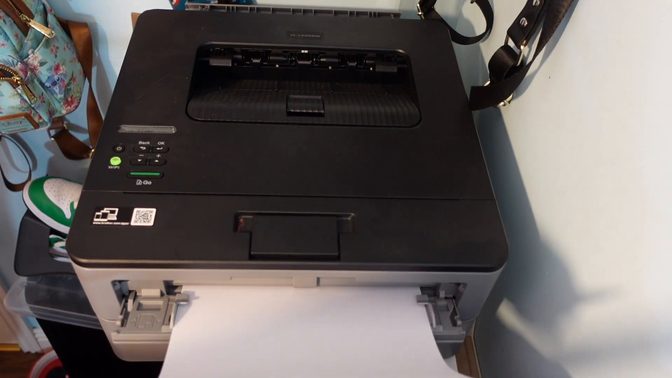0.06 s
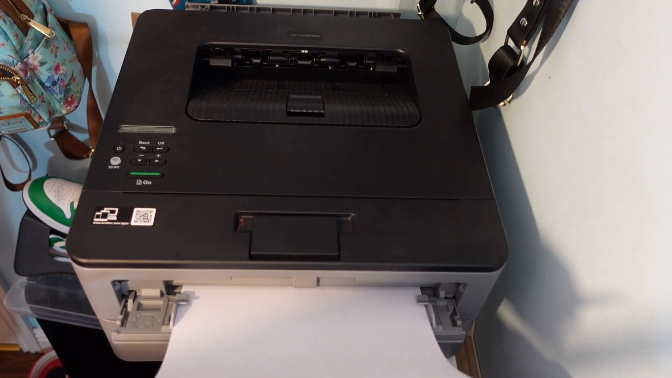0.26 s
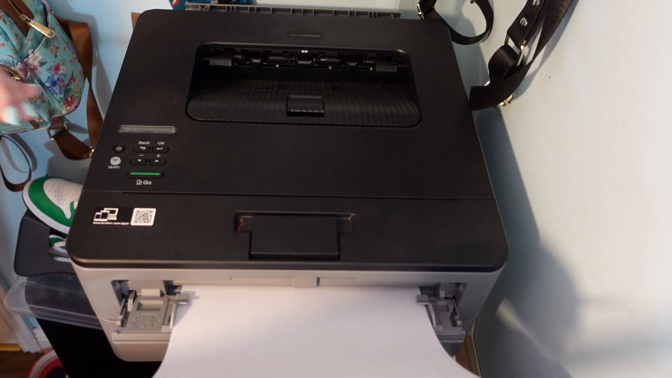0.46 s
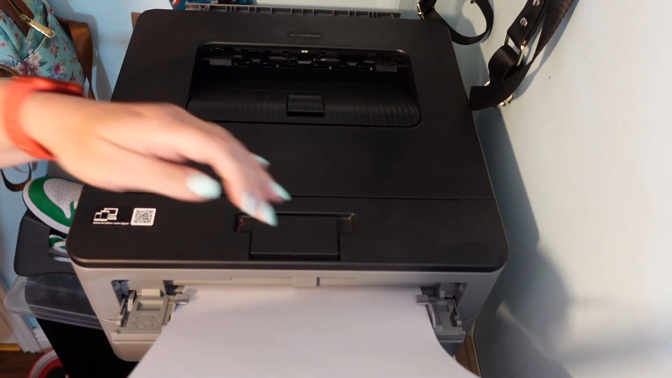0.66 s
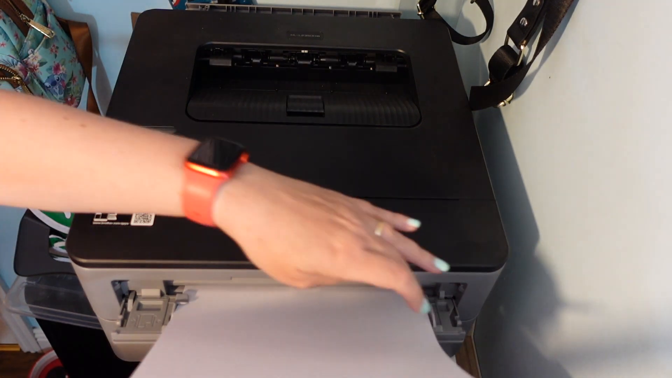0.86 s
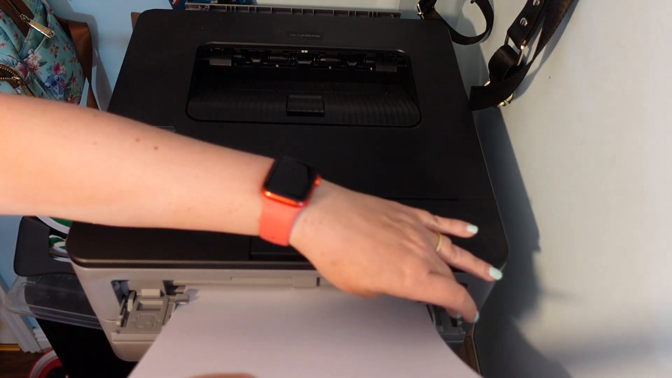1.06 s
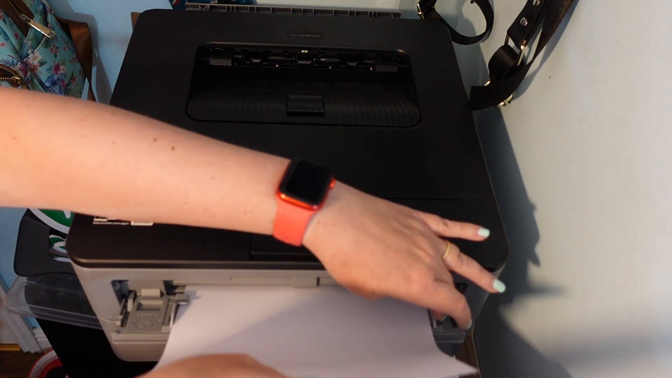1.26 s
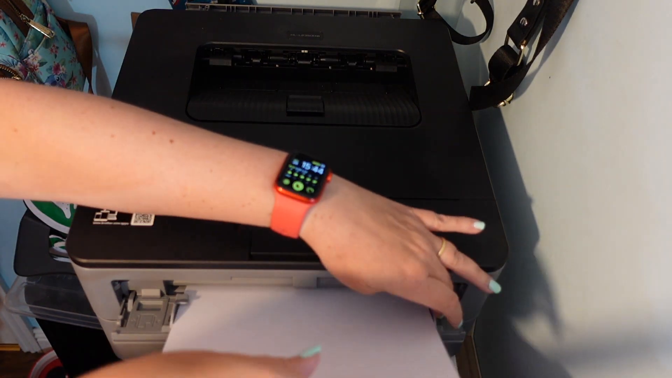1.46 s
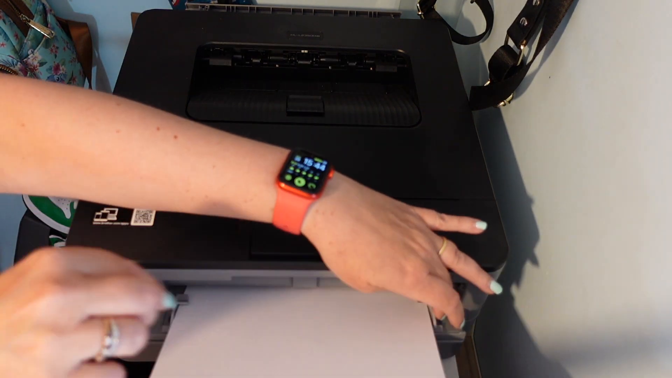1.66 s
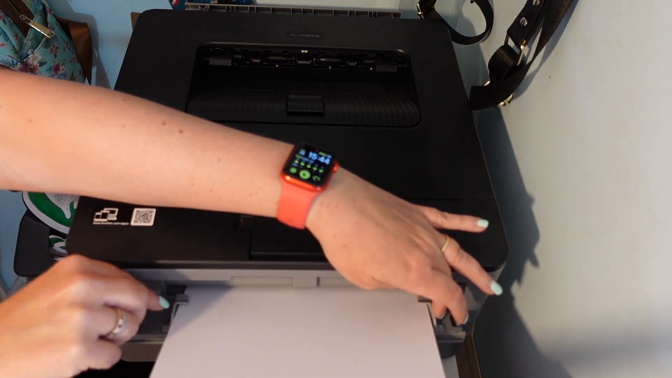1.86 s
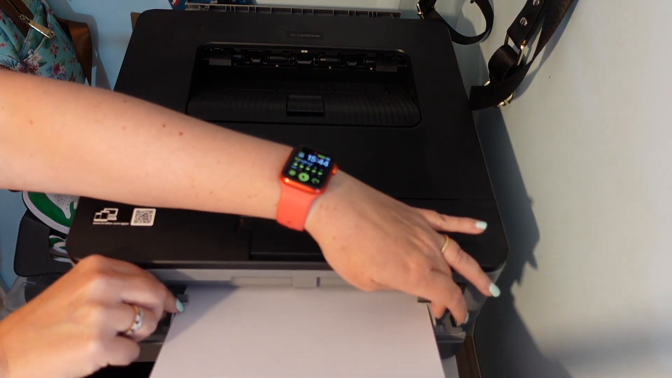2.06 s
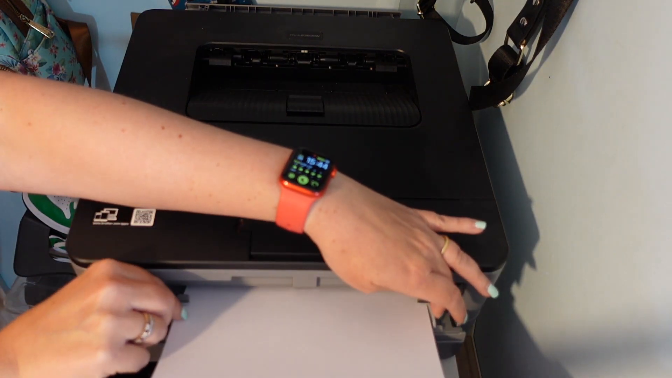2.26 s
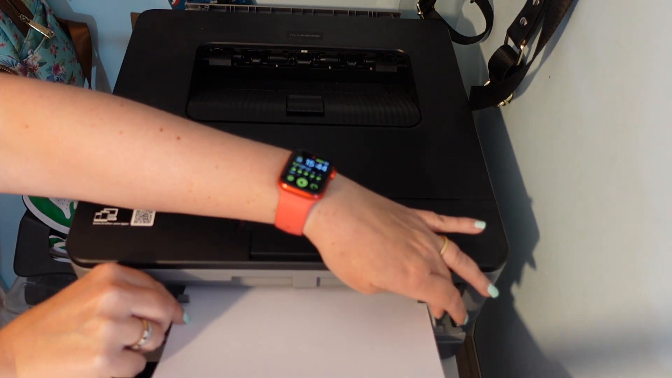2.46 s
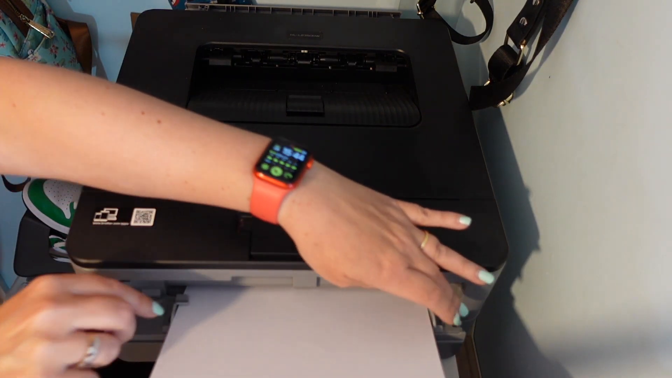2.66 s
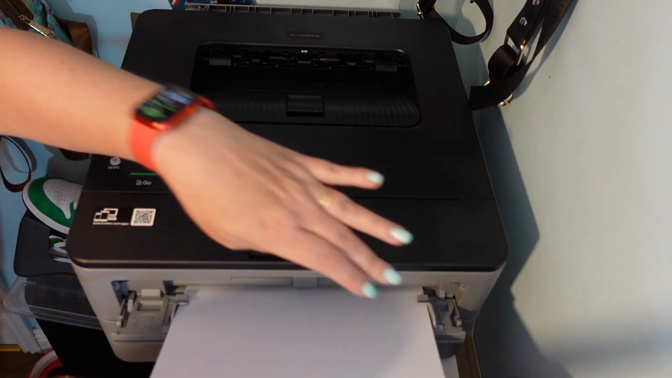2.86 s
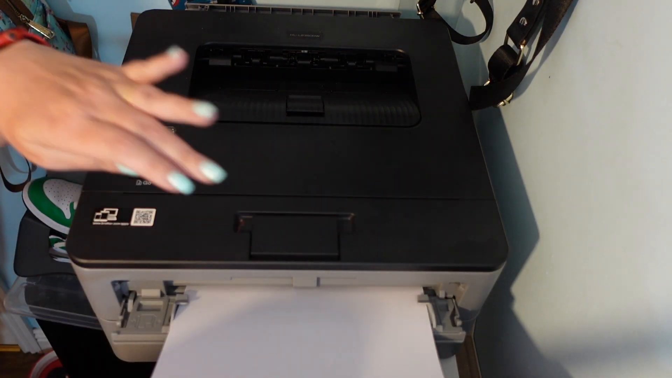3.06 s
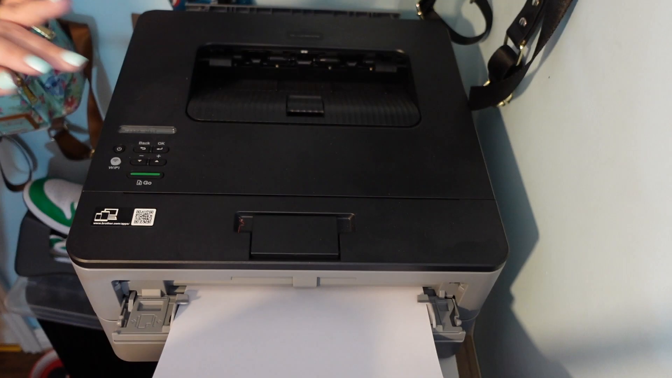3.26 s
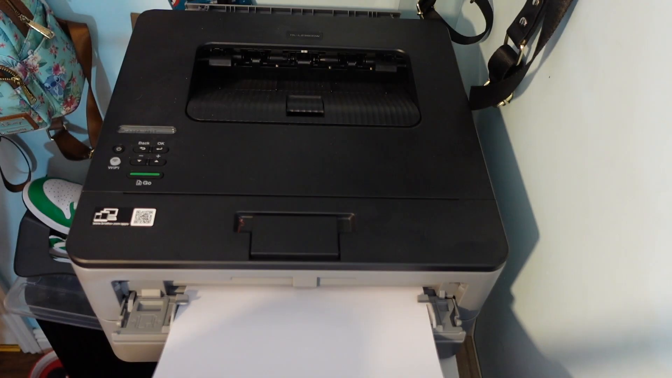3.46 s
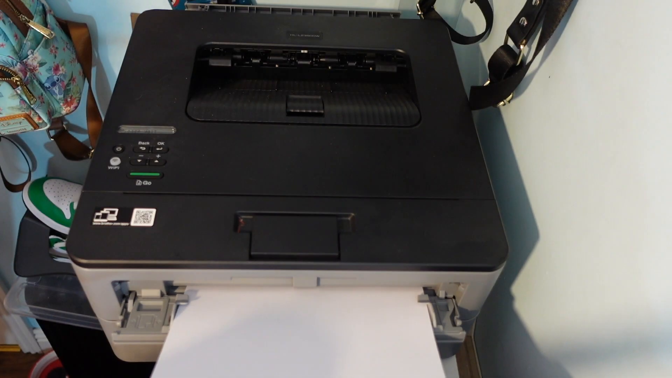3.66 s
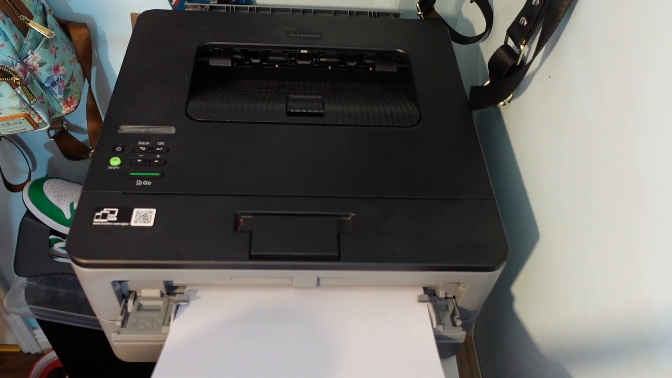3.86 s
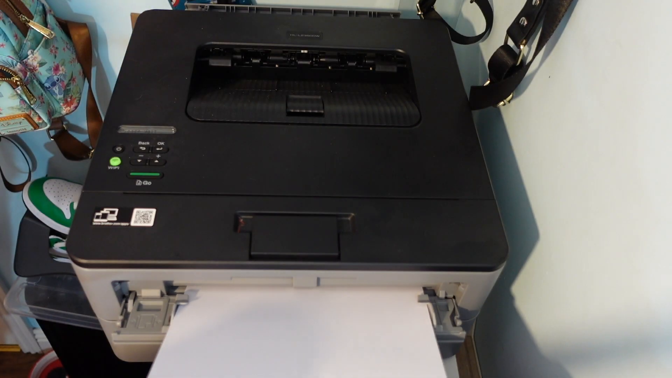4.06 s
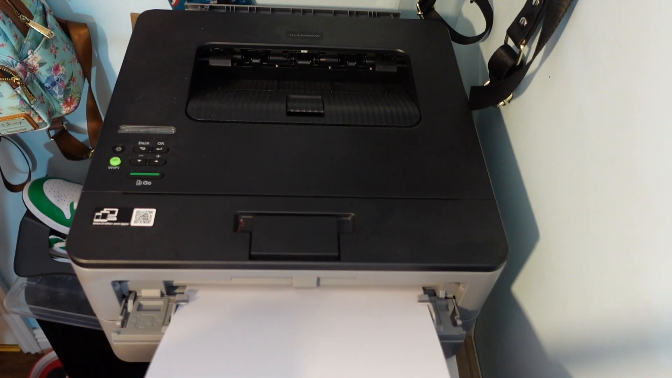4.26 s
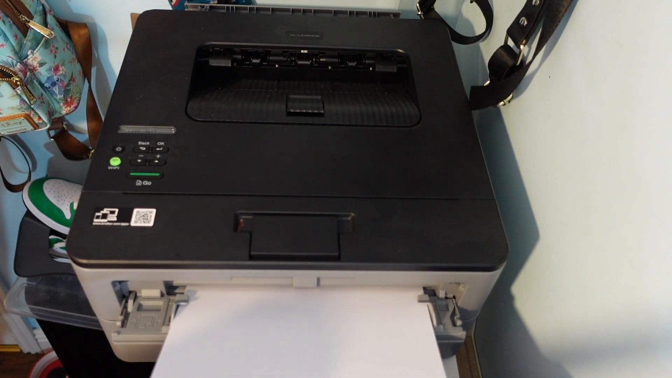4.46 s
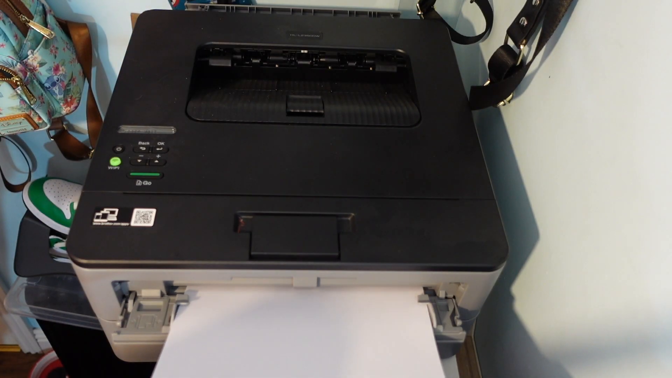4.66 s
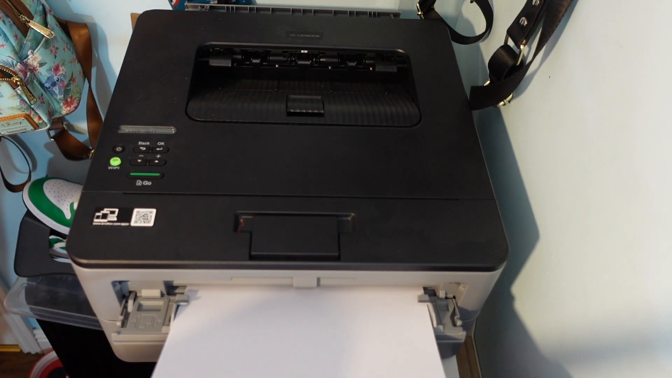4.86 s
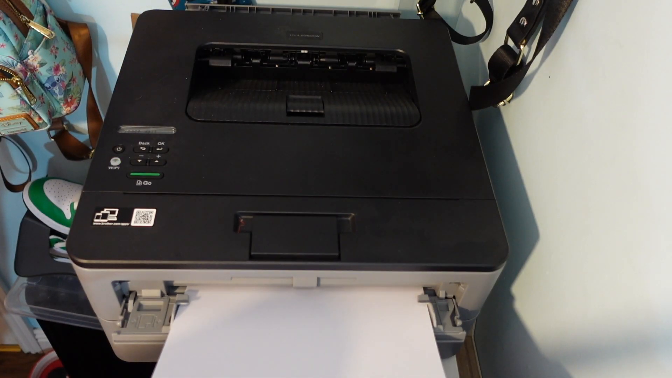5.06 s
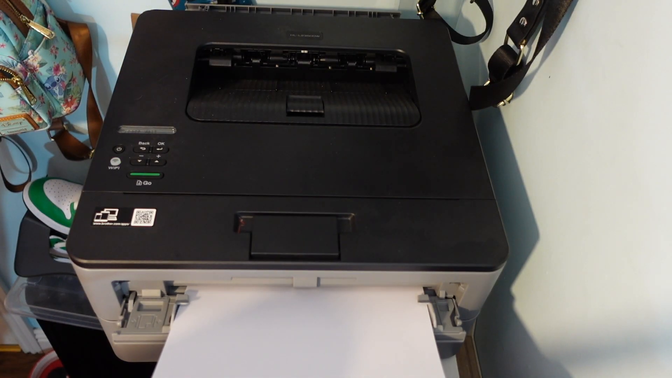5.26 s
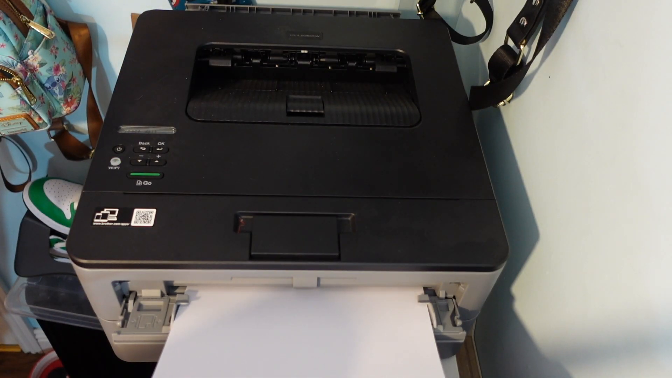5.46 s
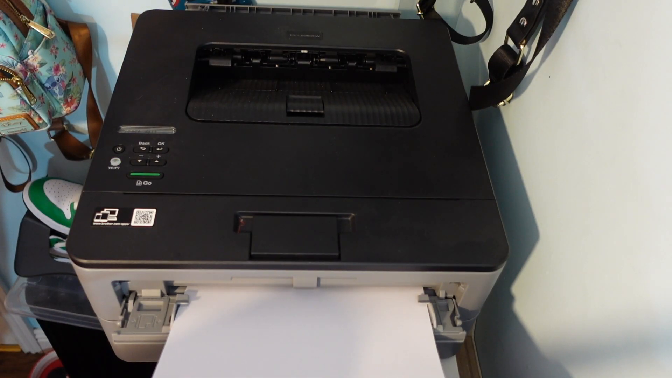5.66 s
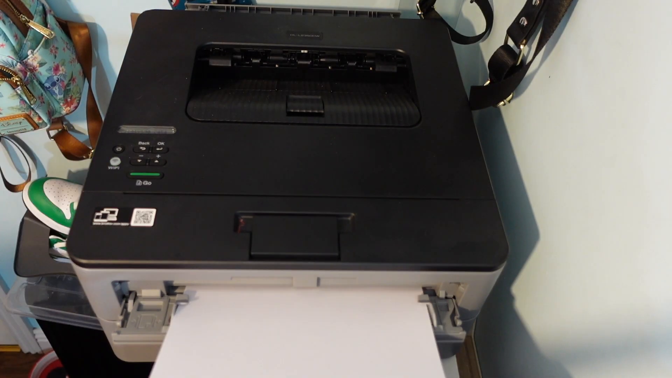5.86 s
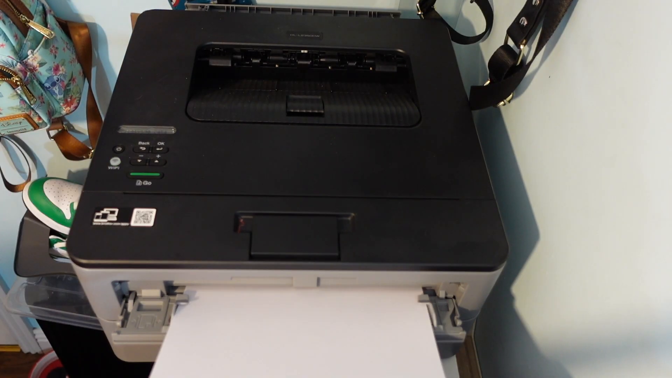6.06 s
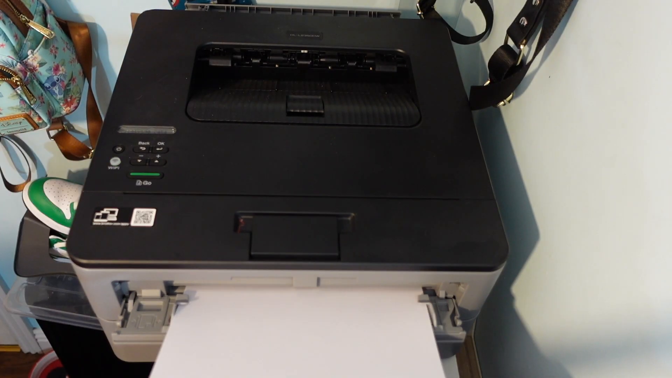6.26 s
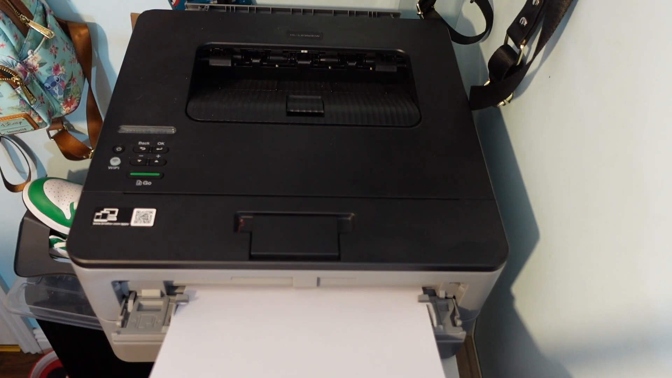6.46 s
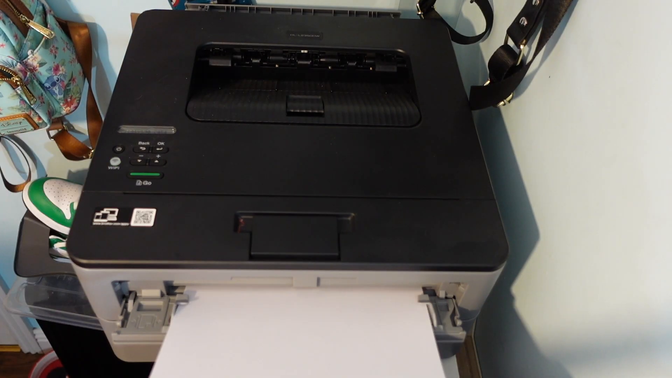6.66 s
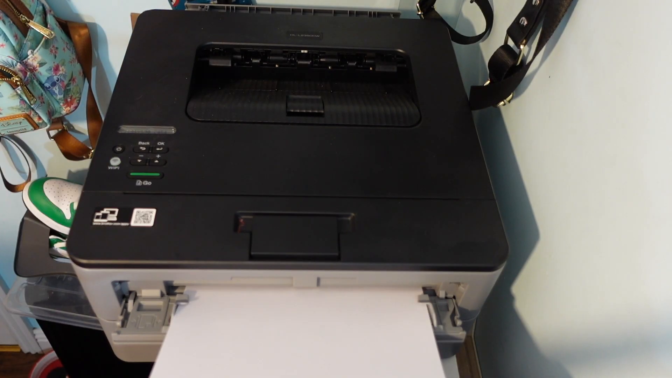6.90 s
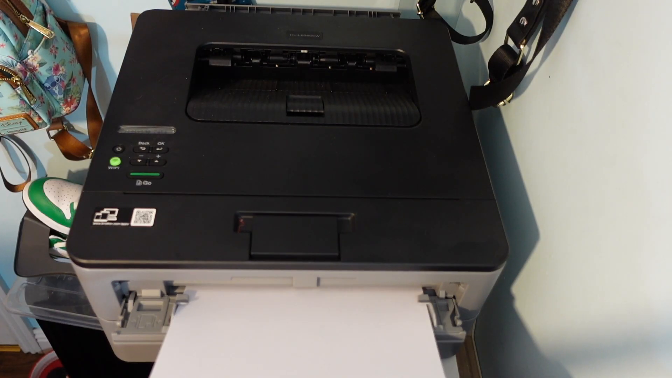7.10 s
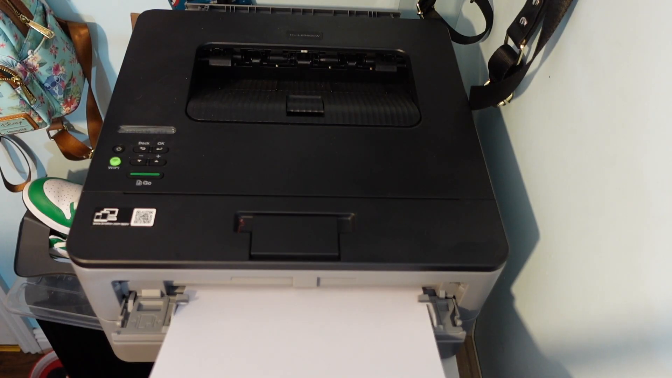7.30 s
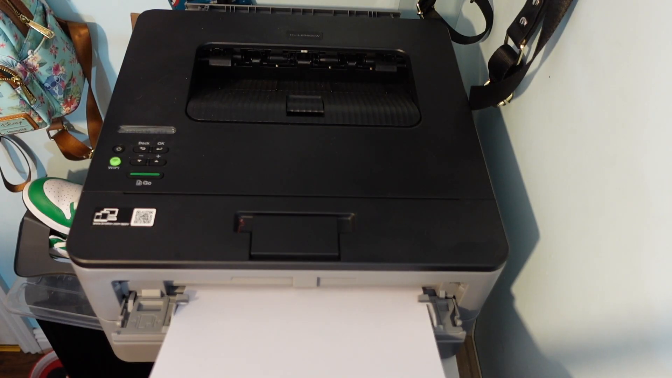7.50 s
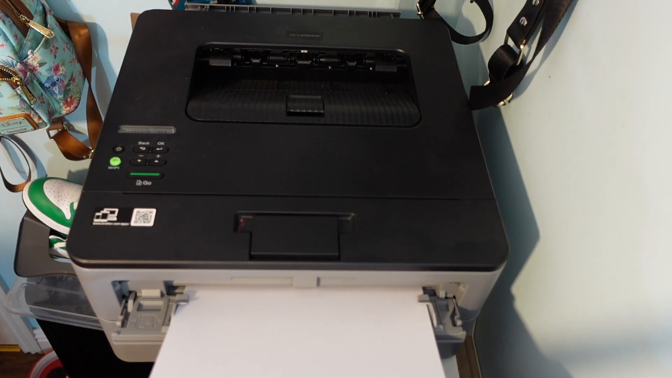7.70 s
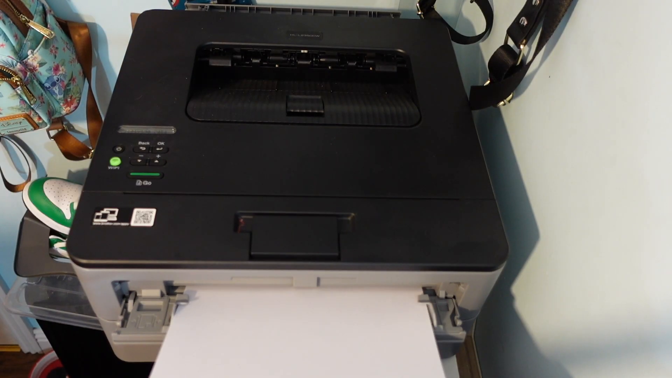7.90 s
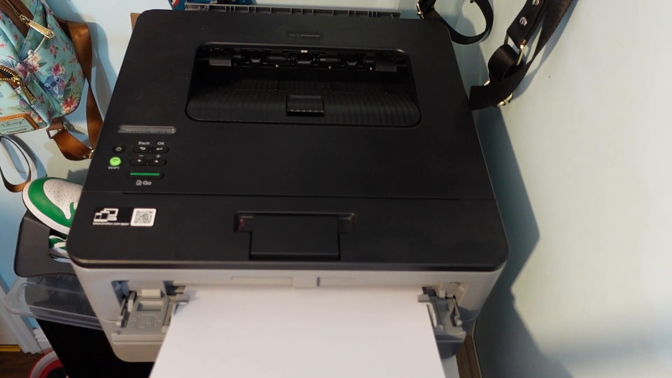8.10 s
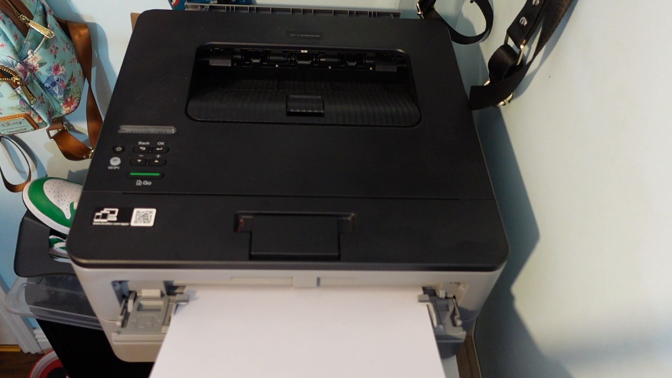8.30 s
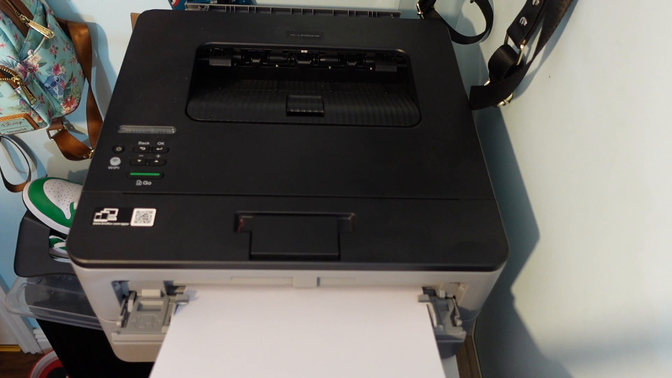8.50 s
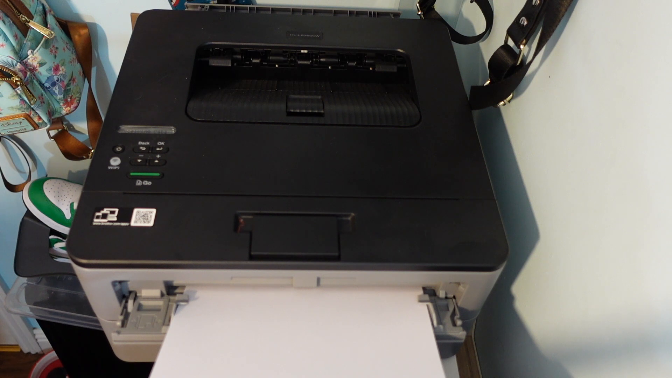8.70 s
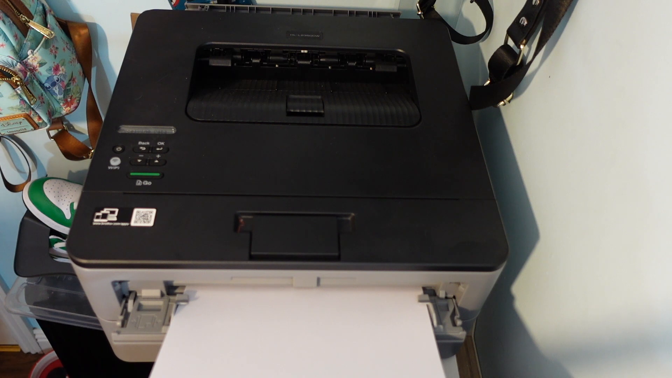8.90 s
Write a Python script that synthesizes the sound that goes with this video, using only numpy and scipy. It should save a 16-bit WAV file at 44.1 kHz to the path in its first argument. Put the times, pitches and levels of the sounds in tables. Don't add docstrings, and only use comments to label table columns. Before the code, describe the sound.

Near microphone, small indoor room with short reflections. Hands rub a sheet against plastic guides, which click, bump and squeal for about three seconds, loudest at a sharp ratchet snap. Then only room hum and a distant engine's rising whine, broken by a dry relay click with tiny bounces. Finally the printer starts with a clunk, gear noise and airy fan, and a rising buzzy tone settles into a constant whistle.

```python
import sys
import numpy as np
from scipy import signal
from scipy.fft import rfft, irfft, next_fast_len
from scipy.io import wavfile

SR = 44100
rng = np.random.default_rng(int(sys.argv[2]) if len(sys.argv) > 2 else 0)


def volts(x):
    e = np.asarray(x, float) / 20
    return 10 ** e


def store_pcm(level_fs):
    pcm = np.round(np.clip(level_fs, -1, 1) * 32767).astype(np.int16)
    wavfile.write(sys.argv[1], SR, np.atleast_2d(pcm).T)


N = 394254
TOP_HZ = 15800

# (frequency [Hz], likeness [0 to 1])
LIKENESS = [(60, 0.97), (240, 0.98), (950, 0.97), (3770, 0.98), (15000, 1)]
# (frequency [Hz], left minus right [dB])
LEAN = [(60, -1), (180, 1), (550, -0.5), (1650, -0.5), (4970, -2), (15000, 0)]

# (frequency [Hz], level [dB per Hz])
ROOM_SPECTRUM = [(15, -79), (25, -57), (70, -33), (92, -29.5), (317, -16), (344, -16.5), (591, -9),
                 (840, -8), (1230, -9), (1790, -10.5), (2110, -13.5), (2280, -13), (4610, -23),
                 (12200, -27), (16000, -26)]
# (time [s], level [dB])
STREET_LEVEL = [(0, -63), (3, -61.5), (4.5, -62.5), (5.6, -62.5), (5.9, -64), (7, -63.5)]
MAINS_HZ, MAINS_DB = 97, -100.5

# (frequency [Hz], level [dB per Hz])
RUB = [(120, -68), (200, -52), (312, -29), (527, -6.5), (1090, -0.5), (1320, 1.5), (1470, 1.5), (5000, -18),
       (6500, -58), (11000, -120)]
# (frequency [Hz], level [dB per Hz])
HISS = [(1470, -27), (2500, -4), (3460, -10.5), (3950, -4.5), (5270, -8.5), (6600, -10.5), (7590, -11),
        (10900, -16.5), (16000, -31)]
# (frequency [Hz], width [Hz], level [dB])
SHEET = [(5200, 1400, 5), (7950, 490, -10), (2140, 350, 7)]
# (peak time [s], rise [s], rub level [dB], hiss level [dB], fade [dB per s])
STROKES = [(.0, .01, -57, -53, 24), (0.6, 0.068, -49.5, -53, 37), (1.574, 0.0073, -51, -45, 104),
           (.13, 0.0087, -72, -69, 48), (.568, 0.0048, -63, -63, 45), (.72, 0.037, -68, -67, 35),
           (.97, 0.33, -62, -65, 39), (1.11, 0.16, -55, -55.5, 46), (1.3, 0.43, -61, -60.5, 61),
           (1.42, 0.054, -61.5, -68, 23), (1.98, 0.0033, -59, -61, 58), (2.16, 0.17, -86, -64.5, 76),
           (2.545, 0.035, -60.5, -58.5, 47), (2.95, .3, -82, -77, 58), (3.02, 0.026, -61.5, -63, 70),
           (3.64, 0.23, -75, -64.5, 79), (4.432, 0.0026, -53, -50, 116)]
RISE_DB, LIFT_OFF_S, LIFT_DB_S = 20, [0.078, 0.666, 1.765], 304
SING_S, SING_DB, SING_RISE_DB_S, SING_FADE_DB_S = 1.12, -59, 34, 61

# (frequency [Hz], width [Hz], level [dB])
CASE = [(411, 88, 0.5), (528, 45, 2.5), (710, 220, 3.5), (1300, 140, 4.5), (1710, 830, 9.5),
        (2313, 130, 10.5), (2810, 410, 5), (3600, 790, 12.5), (5040, 1600, 0.5), (5660, 260, 10.5),
        (7650, 640, 8.5), (10860, 1300, 9), (11500, 1700, 7)]
# (time [s], peak [dB], own ring [Hz], highs re peak [dB], chatter decay by 60 dB [s])
THUDS = [
    (0.0232, -29, 1000, -14, .045),
    (0.085, -32, 2600, -14, .04),
]
BUMPS = [(2.018, -31.5, 1160, -18, 0.03), (1.2173, -27, 1230, -10, 0.035), (1.226, -32.5, 1230, -14, 0.13),
         (1.1638, -32.5, 1170, -18, 0.16), (1.2772, -30, 2060, -9, 0.064), (1.335, -37, 2870, -19, 0.055),
         (1.5855, -16, 2010, -7, 0.054), (1.6725, -29, 2345, -16, .025), (2.0274, -34.5, 1450, -18, 0.047),
         (2.197, -36, 2460, -16, 0.038), (2.505, -36, 3020, -14, 0.042), (2.601, -36.5, 1190, -8, 0.076),
         (3.0845, -40, 1630, -10, 0.082)]
SNAPS = [(1.2953, -26.5, 2430, -8, 0.05), (1.531, -29.5, 2360, -7, 0.067), (1.5602, -30.5, 2600, -9, .04),
         (1.5785, -14, 4190, -1.5, 0.026), (1.5927, -18, 2050, -10, 0.048), (1.6094, -27, 2100, 0, 0.034),
         (1.6425, -27.5, 3500, -2, 0.015), (1.6468, -34, 3750, 0, .03), (1.6637, -24.5, 2370, -10, 0.026),
         (1.682, -32.5, 2950, -4, 0.042), (1.693, -35, 2360, -8, 0.036), (1.743, -45, 3830, -7, 0.025),
         (2.022, -42, 5000, 2.5, 0.021), (2.206, -41, 2380, -4, .03), (2.498, -33.5, 3120, -1, 0.058),
         (2.583, -36, 3020, -9, .02), (2.587, -31, 4200, -1, 0.028), (2.628, -39, 1440, -4, 0.038),
         (3.05, -42, 1550, -2, 0.057), (3.0619, -38.5, 1600, -6, 0.068)]
TAPS = [(0.1005, -43, 2420, -18, 0.048), (0.407, -53, 1300, -5, .05), (0.6295, -44, 2400, -12, 0.023),
        (0.647, -36, 2300, -20, 0.02), (0.671, -37, 2460, -16, .04), (0.711, -44, 1630, -18, .07),
        (1.0194, -36.5, 2280, -12, .04), (1.148, -29, 2840, -21, 0.043), (1.4187, -35.5, 3690, -18, 0.026),
        (1.1215, -29, 2900, -17, .02), (1.128, -35, 2000, -14, 0.028), (1.152, -38, 2800, -16, .02),
        (1.045, -37, 2080, -14, 0.046), (1.4305, -39.5, 4270, -12, .02), (1.447, -41, 2270, -14, 0.027),
        (1.337, -39, 2400, -14, .015), (1.9792, -27, 2980, -13, 0.088), (2.159, -32.5, 2500, -20, 0.043),
        (3.569, -52, 1670, -14, 0.046), (7.032, -31, 1460, -3, 0.06)]
SCUFFS = [(.5635, -36.5, 1600, -3, 0.091), (.618, -28.5, 1300, -12, 0.075), (.638, -33.5, 2600, -22, 0.064),
          (1.058, -38.5, 3400, -22, .08), (1.113, -27.5, 1750, -21, 0.18), (1.256, -28.5, 1380, -13, 0.12),
          (1.426, -36, 2140, -14, 0.053), (1.571, -27, 2050, -2, .08), (2.066, -48, 4230, 0, 0.12),
          (2.172, -34, 2390, -16, 0.038), (2.561, -35, 2470, -10, 0.057), (2.569, -33, 2500, -13, .05),
          (2.647, -41.5, 1760, -8, 0.052), (7.017, -27, 1980, -13, 0.035), (7.008, -34, 1090, -20, .1)]
RELAY = [
    (4.4326, -28, 3600, -6, 0.039),
    (4.4358, -24.5, 1470, -4, 0.028),
    (4.4476, -32.5, 2370, -8, 0.035),
    (4.4645, -30.5, 2030, -12, 0.023),
    (4.4805, -41, 2800, -10, 0.022),
    (4.4915, -54, 1300, -8, .03),
    (4.5036, -39.5, 2760, -1, 0.026),
    (4.529, -46, 1350, -11, 0.037),
]
# (lows re peak [dB], rise [s])
STRIKE, THUD = (-18, .0003), (-10, .0005)
BUMP, SNAP, TAP, SCUFF = (-15, 0.00056), (-20, 0.0002), (-24, 0.00044), (-19, 0.0036)
# (time [s], frequency [Hz], level [dB], decay by 60 dB [s])
RINGS = [(.036, 533, -37, .12), (.025, 2720, -34, .07), (.088, 720, -41, .04), (.023, 380, -40, .04),
         (.086, 400, -45, .04), (.0219, 1150, -11, .007), (.0835, 700, -16, .008), (.0225, 1700, -30, .012),
         (.0225, 800, -30, .02), (.084, 1400, -29, .012), (8.915, 40, -34, .1), (1.59, 340, -45, .15),
         (2.135, 8000, -62, .15), (2.503, 1260, -42, .05), (1.258, 1380, -34, .07), (1.283, 1500, -38, .04),
         (1.14, 1750, -38, .06), (4.436, 2100, -34, .05), (2.505, 950, -48, .04), (.098, 520, -47, .06),
         (3.568, 1700, -37, .01), (.066, 2720, -53, .04), (1.22, 180, -62, .12), (1.585, 200, -60, .15),
         (.622, 1300, -38, .04), (.63, 800, -42, .04), (.71, 1500, -46, .04)]
# (start [s], end [s], start [Hz], end
# [Hz], level [dB])
SQUEALS = [
    (.85, 1.126, 5600, 5050, -65),
    (.95, 1.117, 3490, 3300, -60),
    (.8, 1.204, 7500, 7700, -73),
    (1.2, 1.497, 7700, 7660, -75),
    (1.36, 1.477, 5840, 5600, -68),
    (2.05, 2.17, 6400, 6150, -65),
    (2.05, 2.173, 4250, 4060, -69),
    (2.06, 2.13, 7400, 7200, -72),
    (7.094, 7.16, 6670, 6500, -52),
]
SQUEAL_WIDTH_HZ = 220
ROOM_T60_S, WALL_CUT_HZ = 0.46, 1500
LAG = 0.11

# (time [s], pitch [Hz], level [dB])
ENGINE = [
    (3.15, 223.4, -93),
    (3.5, 249, -87),
    (3.9, 271.4, -72.5),
    (4.4, 286.5, -85),
    (4.8, 298, -88),
    (5.15, 299, -74),
    (5.7, 310.6, -79),
    (5.78, 304, -95),
]
# (multiple of the pitch, level [dB])
ENGINE_ORDERS = [(2, 1.4)]
# (start [s], end [s], multiple of the pitch, level [dB])
OVERTONES = [
    (4.55, 5.2, 5.52, -70),
    (4.75, 5.8, 3.99, -75),
    (4.55, 5.75, 4.99, -76),
    (3.2, 4.7, 1, -85),
    (4.7, 5.8, 2, -79),
]
# (start [s], end [s], start [Hz], end [Hz], level [dB])
WHINES = [(2.4, 3.4, 1300, 1285, -74), (3.4, 3.82, 1275, 1312, -72), (3.1, 3.65, 590, 645, -77),
          (3.3, 3.6, 710, 755, -78), (3.1, 3.9, 812, 850, -78), (2.75, 3.3, 1660, 1650, -76),
          (3.8, 4.2, 1630, 1670, -79), (3.6, 4.5, 1520, 1570, -79), (4.05, 4.7, 1265, 1322, -73),
          (5.6, 6.45, 815, 880, -75), (5.9, 6.65, 870, 790, -75), (5.2, 5.6, 840, 860, -79),
          (4.8, 5.6, 2290, 2330, -80)]
SWELL_DB = 3

START_S = 7.023
JOLT_T_S, RUN_UP_S = 0.0072, 0.29
# (frequency [Hz], level [dB per Hz])
GEAR_TRAIN = [(59, -76), (100, -92), (299, -6.5), (427, -10), (521, -3), (961, -8), (1050, -3.5),
              (1770, -6.5), (2040, -9.5), (2160, -8), (3000, -9.5), (3900, -30), (6600, -120)]
# (frequency [Hz], width [Hz], level [dB])
FRAME = [(229, 8, -6), (297, 16, 0), (383, 10, 8), (535, 16, 7), (455, 10, -6), (590, 10, -4), (690, 22, 2),
         (921, 16, 3), (1043, 16, 5), (1180, 14, 2), (1270, 8, 6), (1298, 8, 8), (1357, 9, 5),
         (1530, 15, 0), (1644, 9, 10)]
# (frequency [Hz], level [dB per Hz])
AIR = [(880, -52), (1500, -23), (1900, -8), (1980, -3), (2390, -9), (3690, -8), (4160, -7), (7030, -14.5),
       (8320, -21.5), (8830, -16), (16000, -60)]
# (frequency [Hz], width [Hz], level [dB])
DUCTS = [(2640, 90, -4), (5160, 50, 1), (5600, 72, 3), (7650, 130, 0), (9560, 150, -7.5), (10200, 150, -9)]
GEAR_DB, GEAR_JOLT_DB, GEAR_LAG_DB = -38.5, 5, 3
AIR_DB, AIR_JOLT_DB, AIR_LAG_DB = -41, 14, 7
SHIELD_HZ, SHIELD_S, SHIELD_DB, SHIELD_SAG_DB_S = 6700, 7.1, -54.5, 2

MIRROR_ON_S, SPIN_S, FREE_RPS, SPIN_T_S = 7.38, 7.41, 691, 1.2
LOCK_S, LOCK_RPS, OVERSHOOT_RPS, SETTLE_S = 8.23, 337.6, 4.2, .35
TORQUE_DB, TORQUE_DB_PER_RPS, LOCK_DROP_DB = -41, -.058, -8
JUDDER_RPS, MOTOR_LOW_HZ = 2.2, 1300
# (multiple of the turning rate, level [dB])
COGGING = [(27.35, -4), (54.7, 0), (82.05, -13), (109.4, -15)]
# (time [s], level [dB])
HALF_ORDER = [
    (7.74, -20),
    (7.84, 3),
    (7.9, 10),
    (7.96, 10),
    (8.04, 7),
    (8.1, 0),
    (8.2, -4),
    (8.35, -16),
]
# (frequency [Hz], width [Hz], level [dB])
HOUSING = [(1800, 600, 6), (4160, 200, 11), (8270, 260, 22), (13900, 600, 8), (7600, 200, 5),
           (10200, 1000, 7), (5300, 500, 6), (9300, 400, 5), (3000, 1200, 0)]
BARE_DB = -7
# (time [s], level [dB])
COIL = [(7.38, -30.5), (7.43, -43), (7.478, -53), (7.55, -44), (7.63, -51), (7.77, -60), (7.84, -50),
        (7.9, -43.5), (7.94, -50.5), (8.0, -43.5), (8.03, -46), (8.15, -38.5), (8.2, -42), (8.23, -48),
        (8.27, -47.5), (8.66, -49), (8.82, -45), (8.94, -57)]
LOW_BUZZ_DB, LOW_BUZZ_FOLLOWS = -50.5, 0.54
# (multiple of the turning rate, level [dB])
FACETS = [(3, -26), (6, 0), (12, -23)]
# (time [s], level [dB])
WHISTLE = [
    (8.05, -66),
    (8.1, -47),
    (8.18, -43),
    (8.208, -49),
    (8.23, -40),
    (8.45, -41.5),
    (8.54, -39),
    (8.94, -39),
]


def rms_one(x):
    return x / np.sqrt(np.mean(x ** 2) + 1e-20)


def in_time(rows, off=None):
    s, *columns = np.transpose(rows)
    return [np.interp(np.arange(N) / SR, s, c, off, off) for c in columns]


def at_hz(points, hz):
    point_hz, value = np.array(points).T[:2]
    return np.interp(np.log(hz), np.log(point_hz), value)


def drift(rate):
    r = np.exp(-80 * np.pi * rate / SR)
    slow = signal.lfilter([1], [1, -2 * r, r * r], rng.standard_normal(N // 40 + 2002))[2000:]
    return np.interp(np.arange(N) / 40, np.arange(len(slow)), rms_one(slow))


def filtered(x, order, edge_hz, kind="low"):
    return signal.sosfilt(signal.butter(order, edge_hz, kind, fs=SR, output="sos"), x)


def resonance(x, hz, width_hz):
    r = np.exp(-np.pi * width_hz / SR)
    poles = [1, -2 * r * np.cos(2 * np.pi * hz / SR), r * r]
    return signal.lfilter(np.array([1, 0, -1]) * (1 - r * r) / 2, poles, x + 1e-18)


def sharp_resonance(x, hz, width_hz):
    return resonance(resonance(x, hz, width_hz), hz, width_hz)


def ringing(x, modes):
    return rms_one(sum(volts(db) * resonance(x, hz, w) for hz, w, db in modes))


def coloured(x, spectrum):
    pad = next_fast_len(N)
    hz = np.maximum(np.fft.rfftfreq(pad, 1 / SR), 1)
    return rms_one(irfft(rfft(x, pad) * volts(at_hz(spectrum, hz)), pad)[..., :N])


def wide(spectrum, apart_db=0.):
    hz = np.geomspace(20, 20000, 40)
    alike = np.clip(at_hz(LIKENESS, hz), 0, .999)
    side = volts(apart_db) * np.sqrt((1 - alike) / (1 + alike))
    mid, other = rng.standard_normal((2, N))
    pad = next_fast_len(N)
    f = np.maximum(np.fft.rfftfreq(pad, 1 / SR), 1)
    sign = np.array([[1], [-1]])
    both = rfft(mid, pad) + sign * np.interp(f, hz, side) * rfft(other, pad)
    both = both * volts(sign * at_hz(LEAN, f) / 2)
    return rms_one(irfft(both * volts(at_hz(spectrum, f)), pad)[:, :N])


def tones(rate_hz, orders, wander):
    turn = 2 * np.pi * np.cumsum(rate_hz) / SR
    out = 0
    for k, db in orders:
        audible = k * rate_hz < TOP_HZ
        out = out + np.sqrt(2) * volts(db + wander * drift(24)) * np.sin(k * turn) * audible
    return out


def street_hum():
    mains = volts(MAINS_DB) * tones(np.full(N, MAINS_HZ), [(0.99, 0)], wander=1.3)
    return volts(in_time(STREET_LEVEL)[0] + 0.3 * drift(4.1)) * wide(ROOM_SPECTRUM, apart_db=14.5) + mains


def peak_db(s, db, rise_db_s, fade_db_s):
    t = np.arange(N) / SR - s
    return db - np.where(t < 0, -rise_db_s * t, fade_db_s * t)


def strokes():
    t, out = np.arange(N) / SR, np.zeros((2, N))
    ends = LIFT_OFF_S + [np.inf] * len(STROKES)
    for (s, rise, rub_db, hiss_db, fade), end in zip(STROKES, ends):
        shape = volts(peak_db(s, 0, RISE_DB / rise, fade) - LIFT_DB_S * np.maximum(t - end, 0))
        out += volts([[rub_db], [hiss_db]]) * shape
    return out


def slides():
    rub, hiss = strokes()
    sizes = volts(3 * np.minimum(rng.exponential(1, N), 4)) * rng.choice([-1, 1], N)
    caught = rng.random(N) < 3000 * volts(4 * drift(40)) / SR
    grains = rms_one(caught * sizes) + rng.standard_normal(N)
    grains = grains + 0.16 * rng.standard_normal(N) * np.array([[1], [-1]])
    sung = rms_one(sum(volts(db + 2 * drift(10)) * sharp_resonance(grains, hz, w) for hz, w, db in SHEET))
    sing = volts(peak_db(SING_S, SING_DB, SING_RISE_DB_S, SING_FADE_DB_S))
    catch = volts(1.2 * drift(45))
    return catch * (rub * coloured(grains, RUB) + hiss * coloured(grains, HISS) + sing * sung)


def contact_force(t, t60, rise):
    noise, chatter = rng.standard_normal(len(t)), rng.exponential(1, len(t))
    force = noise * volts(2.63 * chatter) * volts(-60 * t / np.clip(t60, .005, .2))
    force = force * (1 - np.exp(-t / rise)) ** 2
    force[0] = min(11, .004 / rise)
    return force


def case_ringing(force, hz):
    spread_db = rng.normal(0, 2.4, len(CASE))
    blow = 0
    for k, ((f, w, db), extra_db) in enumerate(zip(CASE, spread_db)):
        blow = blow + (-1) ** k * volts(db + extra_db) * rms_one(resonance(force, f, w))
    own_pitch = rms_one(resonance(force, hz, 67))
    crack = rms_one(resonance(force, 4000, 9700))
    return rms_one(blow) + 0.39 * own_pitch + 0.79 * crack


def knocks():
    size = 6144
    out, t = np.zeros(N + size), np.arange(size) / SR
    kinds = [(RELAY, STRIKE), (THUDS, THUD), (BUMPS, BUMP), (SNAPS, SNAP), (TAPS, TAP), (SCUFFS, SCUFF)]
    for rows, (low_db, rise) in kinds:
        for s, db, hz, high_db, t60 in rows:
            blow = case_ringing(contact_force(t, t60, rise), hz)
            low, mid, high = [filtered(blow, 3, edges, "band")
                              for edges in ([250, 900], [900, 5000], [5000, 15500])]
            high = high * volts(-60 * t / 0.72)
            blow = volts(low_db) * low / abs(low).max() + mid / abs(mid).max()
            blow = blow + volts(high_db) * high / abs(high).max()
            start = round(s * SR)
            out[start:start + size] += volts(db - 1.5) * blow
    return out[:N]


def rings():
    out = np.zeros(N)
    for s, hz, db, t60 in RINGS:
        t = np.maximum(np.arange(N) / SR - s, 0)
        out += volts(db - 60 * t / t60) * (1 - np.exp(-hz * t)) ** 2 * np.sin(2 * np.pi * hz * t)
    return out


def room(x):
    pad = next_fast_len(N + SR)
    hz = np.fft.rfftfreq(pad, 1 / SR)
    dull = 1 / (1 + 1j * hz / WALL_CUT_HZ)
    out = []
    for lags in rng.uniform(0.012, 0.036, (2, 8)):
        loops = [volts(-60 * lag / ROOM_T60_S) * dull * np.exp(-2j * np.pi * hz * lag) for lag in lags]
        out.append(sum((-1) ** k * g / (1 - g) for k, g in enumerate(loops)))
    shared = out[0] + 0.5 * (np.array(out) - out[0])
    return irfft(shared * rfft(x, pad), pad)[:, :N]


def squeals():
    out = np.zeros(N)
    for a, b, hz0, hz1, db in SQUEALS:
        i, j = round(a * SR), round(b * SR)
        slow = filtered(rng.standard_normal((2, SR)), 2, SQUEAL_WIDTH_HZ)[:, :j - i]
        turn = 2 * np.pi * np.cumsum(np.linspace(hz0, hz1, j - i)) / SR
        squeal = rms_one(slow[0] * np.sin(turn) + slow[1] * np.cos(turn))
        out[i:j] += volts(db) * np.sqrt(np.hanning(j - i)) * squeal
    return out


def vehicle():
    t, (firing, engine_db) = np.arange(N) / SR, in_time(ENGINE)
    engine_db = in_time(ENGINE, off=-140)[1]
    out = volts(engine_db) * tones(firing * (1 + .004 * drift(30)), ENGINE_ORDERS, wander=2.5)
    lines = [(a, b, k * firing, db) for a, b, k, db in OVERTONES]
    lines += [(a, b, np.interp(t, [a, b], [hz0, hz1]), db) for a, b, hz0, hz1, db in WHINES]
    for a, b, pitch, db in lines:
        away = np.abs(2 * t - a - b) / (b - a)
        whine = tones(pitch * (1 + .007 * drift(30)), [(1, 0)], wander=2.5)
        out += (away < 1) * volts(db - SWELL_DB * away ** 4) * whine
    return out


def run_up(db, jolt_db, lag_db):
    t = np.arange(N) / SR - START_S
    after = np.maximum(t, 0)
    level = db + jolt_db * np.exp(-after / JOLT_T_S) - lag_db * np.exp(-after / RUN_UP_S)
    return level + 2500 * np.minimum(t, 0)


def gear_mesh(white):
    return rms_one(wide(GEAR_TRAIN) + volts(-4.5) * ringing(white, FRAME))


def fan_air(white):
    return rms_one(wide(AIR) + volts(-9.5) * ringing(white, DUCTS))


def shield_song(white):
    t = np.arange(N) / SR
    level_db = SHIELD_DB - SHIELD_SAG_DB_S * (t - SHIELD_S) + 2.5 * drift(30)
    return volts(level_db) * rms_one(sharp_resonance(white, SHIELD_HZ, 110)) * (t > SHIELD_S)


def drive():
    white = wide([(20, 0), (20000, 0)])
    throb = .6 * drift(17)
    gears = volts(run_up(GEAR_DB, GEAR_JOLT_DB, GEAR_LAG_DB) + throb) * gear_mesh(white)
    air = volts(run_up(AIR_DB, AIR_JOLT_DB, AIR_LAG_DB) + throb) * fan_air(white)
    return filtered(gears + air + shield_song(white), 4, 160, "high")


def mirror_speed():
    t = np.arange(N) / SR
    free = FREE_RPS * (1 - np.exp(-np.maximum(t - SPIN_S, .005) / SPIN_T_S))
    held = LOCK_RPS + OVERSHOOT_RPS * np.exp(-np.maximum(t - LOCK_S, 0) / SETTLE_S)
    return np.minimum(free, held), np.clip((t - LOCK_S) / .1 + 1, 0, 1)


def housing(x):
    pad = next_fast_len(N)
    f = np.fft.rfftfreq(pad, 1 / SR)
    gain = volts(BARE_DB) + sum(volts(db) / (1 + (2 * (f - hz) / w) ** 2) for hz, w, db in HOUSING)
    return irfft(rfft(x, pad) * gain, pad)[:N]


def cogging(turns, locked):
    torque_db = TORQUE_DB + TORQUE_DB_PER_RPS * turns + LOCK_DROP_DB * locked
    rough = turns + (JUDDER_RPS * (1 - locked) + .003 * turns) * drift(300)
    half = volts(in_time(HALF_ORDER)[0]) * tones(rough, COGGING[:1], wander=1.5)
    tugs = volts(torque_db) * (half + tones(rough, COGGING[1:], wander=1.5))
    return tugs


def coil_buzz(turns):
    coil_db = in_time(COIL)[0]
    noise = rng.standard_normal(N) * volts(3 * drift(34))
    low, middle, high = [rms_one(sharp_resonance(noise, hz, 0.68 * w)) for hz, w, db in HOUSING[1:4]]
    low_db = LOW_BUZZ_DB + LOW_BUZZ_FOLLOWS * (coil_db + 49) + 1.5 * drift(18)
    return volts(low_db) * np.sqrt(turns / LOCK_RPS) * low + volts(coil_db) * middle + volts(-71) * high


def facet_whistle(turns):
    return volts(in_time(WHISTLE, off=-140)[0]) * tones(turns + .7 * drift(25), FACETS, wander=1.0)


def mirror_motor():
    turns, locked = mirror_speed()
    running = np.clip((np.arange(N) / SR - MIRROR_ON_S) / .004, 0, 1)
    tugs = filtered(running * cogging(turns, locked), 1, 9000)
    tugs = filtered(tugs, 4, MOTOR_LOW_HZ, "high")
    return housing(tugs) + running * (coil_buzz(turns) + facet_whistle(turns))


def scene():
    hands = slides() + knocks() + rings() + squeals()
    hands = filtered(hands, 2, 170, "high")
    hands = hands + LAG * np.gradient(hands, axis=-1) * [[1], [-1]]
    near = hands * volts([[-.8], [.8]]) + mirror_motor() * volts([[-.7], [.7]])
    echo = volts(-14.5) * room(near.mean(axis=0))
    return near + echo + street_hum() + vehicle() + drive()


def band_limit(x):
    return signal.sosfilt(signal.butter(12, 15830, fs=SR, output="sos"), x)


def record(dry):
    cut = signal.sosfilt(signal.cheby2(12, 70, TOP_HZ + 900, fs=SR, output="sos"), dry)
    return band_limit(cut)


dry = scene()
out = record(dry)
store_pcm(out)
```